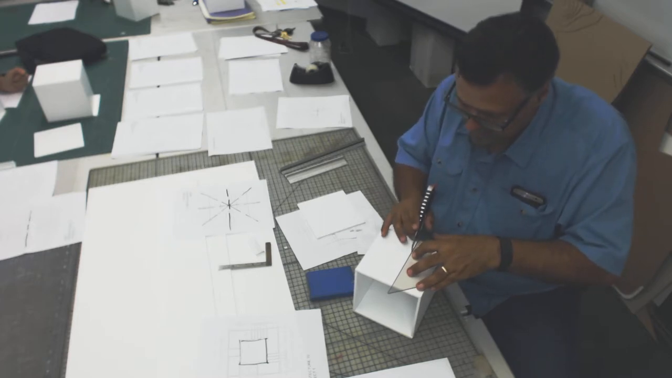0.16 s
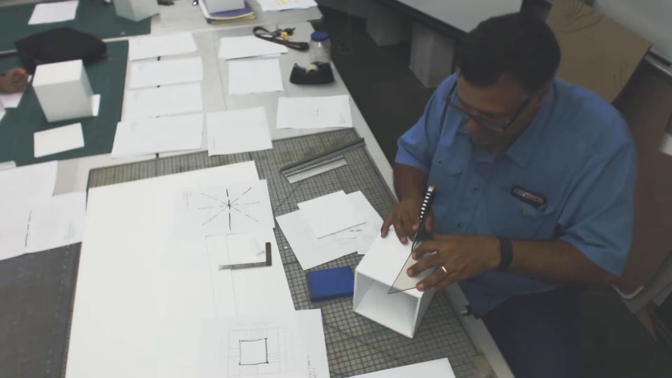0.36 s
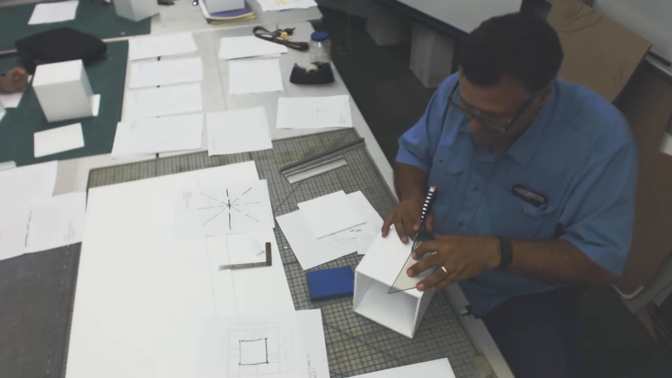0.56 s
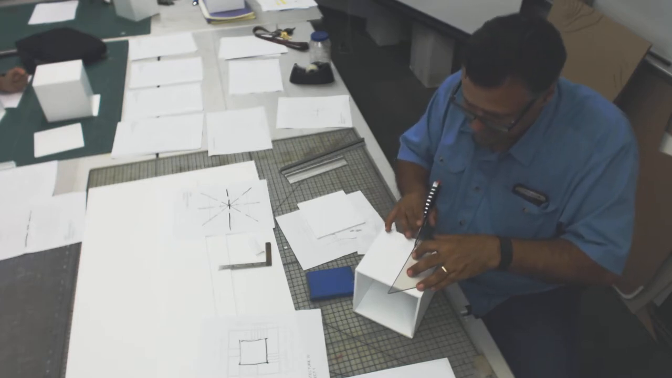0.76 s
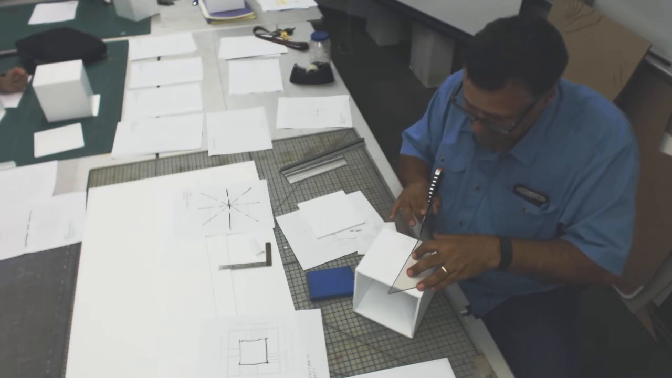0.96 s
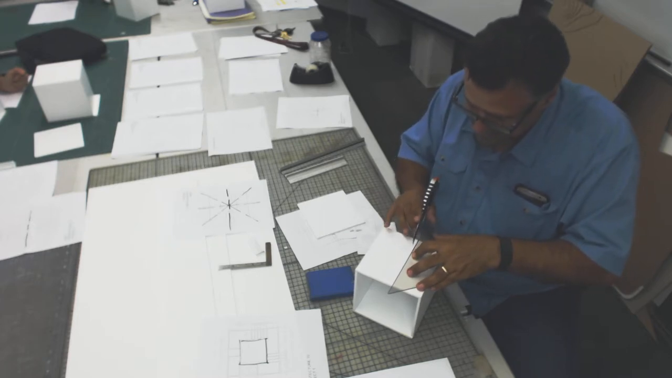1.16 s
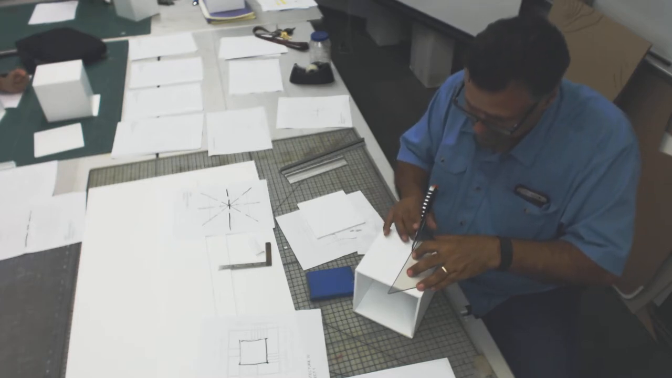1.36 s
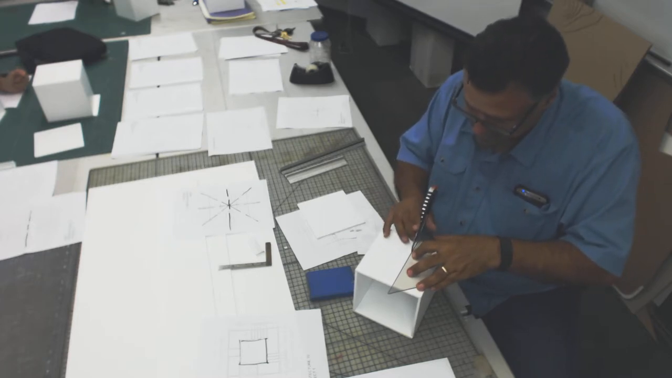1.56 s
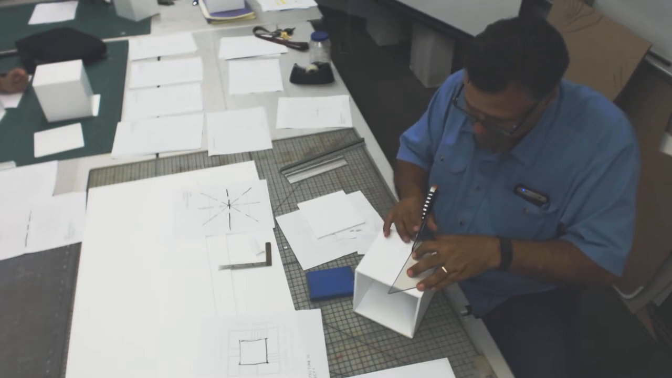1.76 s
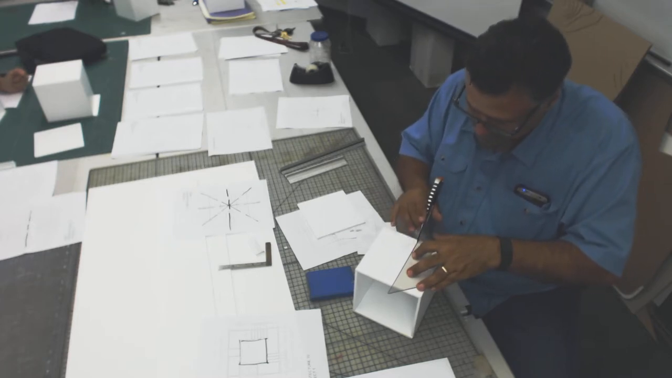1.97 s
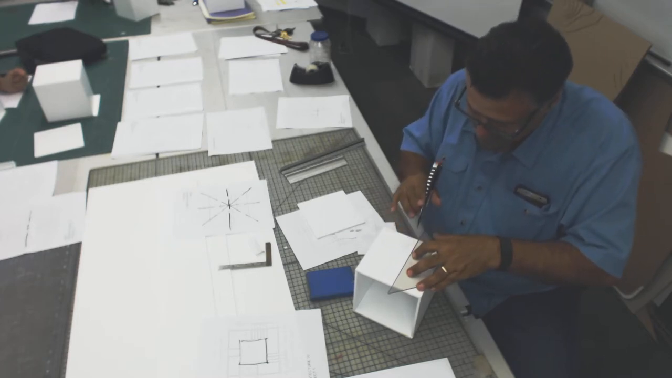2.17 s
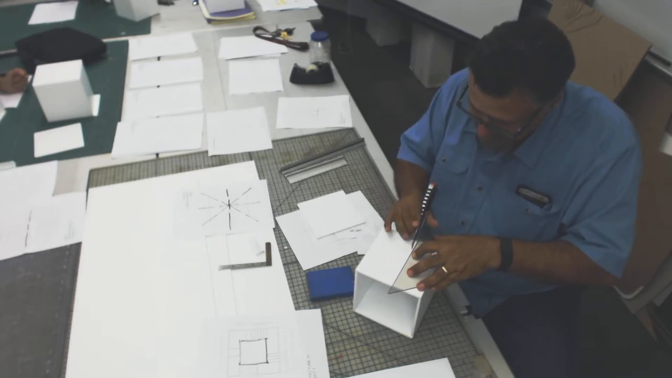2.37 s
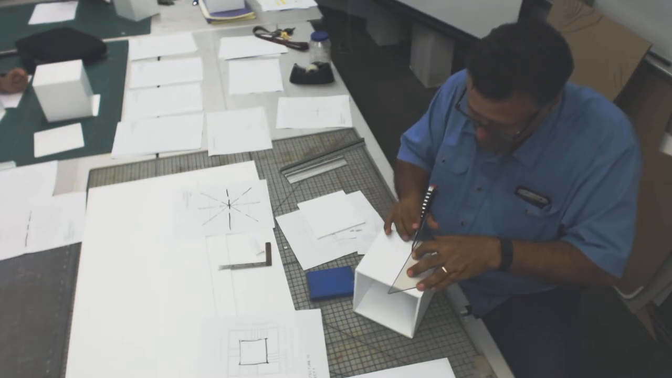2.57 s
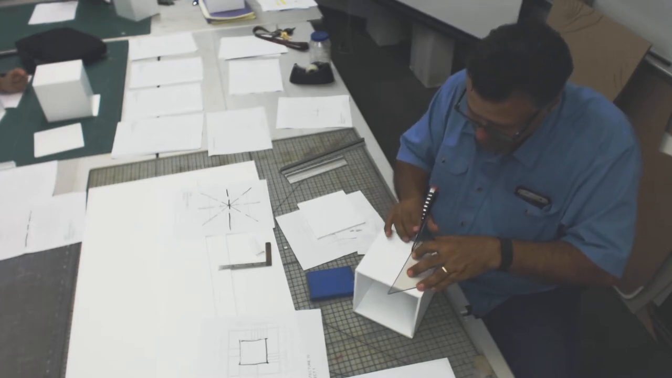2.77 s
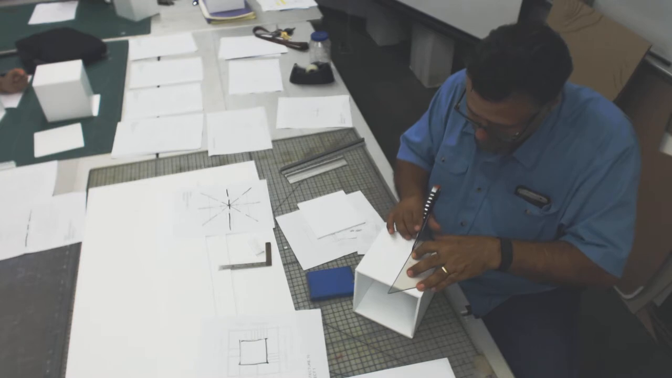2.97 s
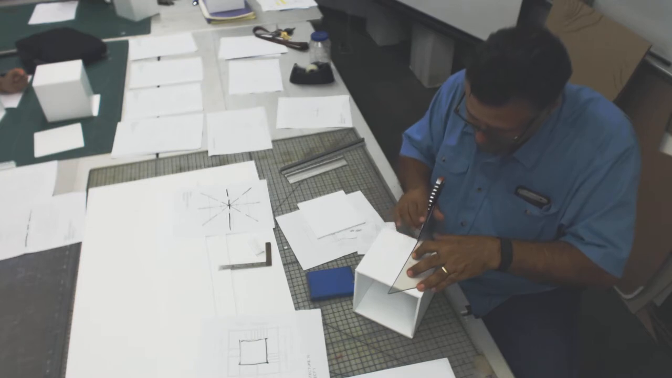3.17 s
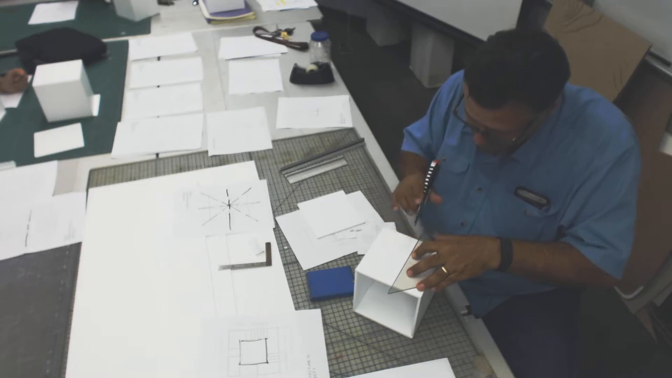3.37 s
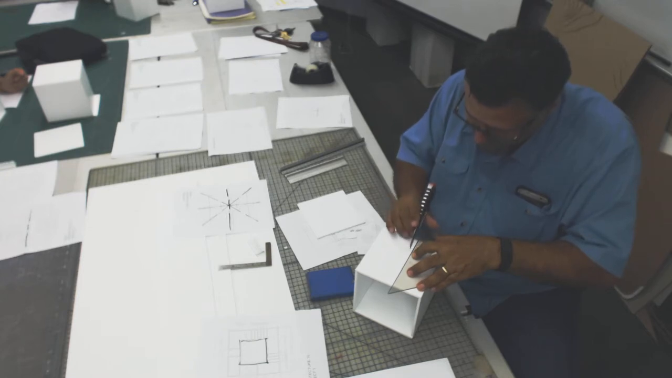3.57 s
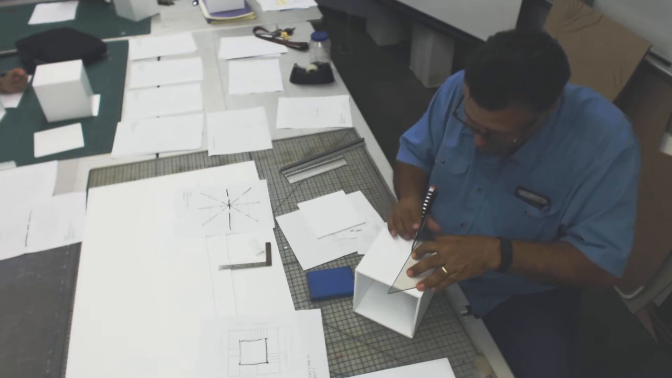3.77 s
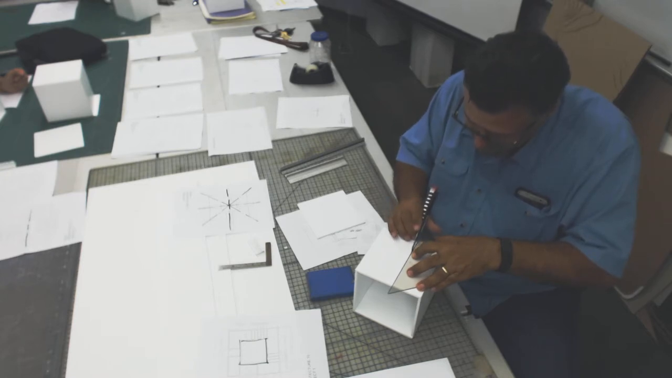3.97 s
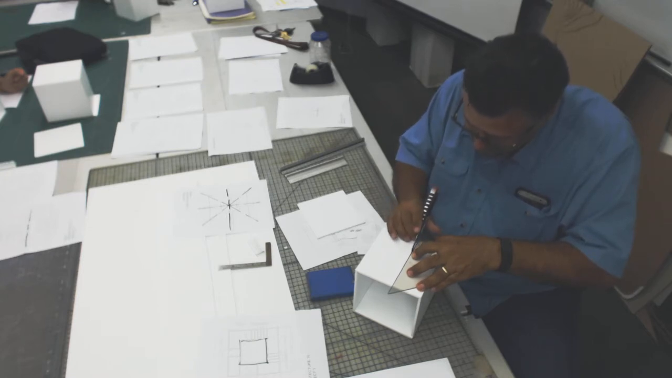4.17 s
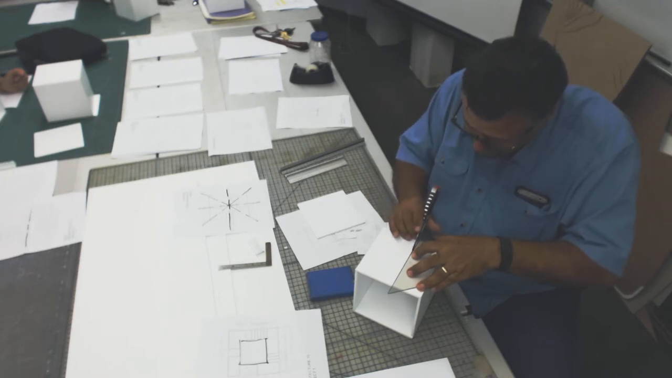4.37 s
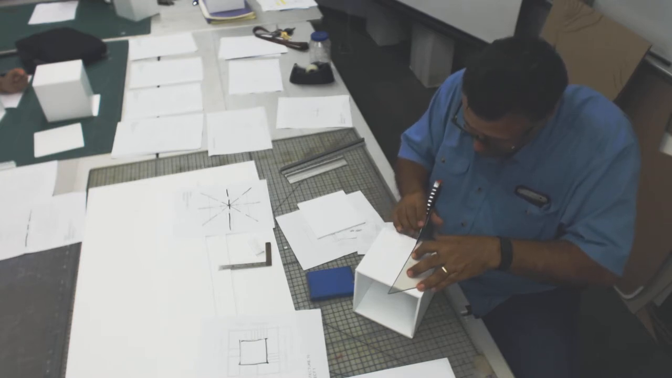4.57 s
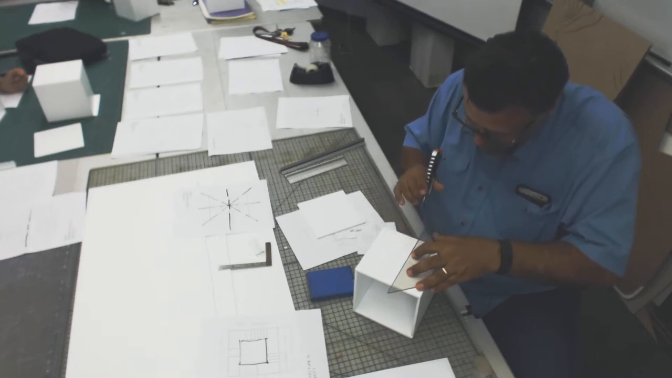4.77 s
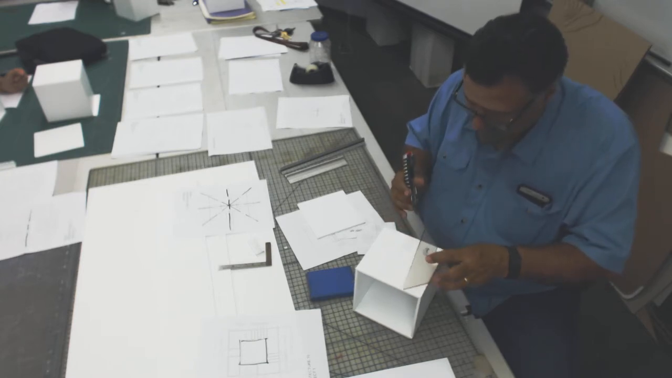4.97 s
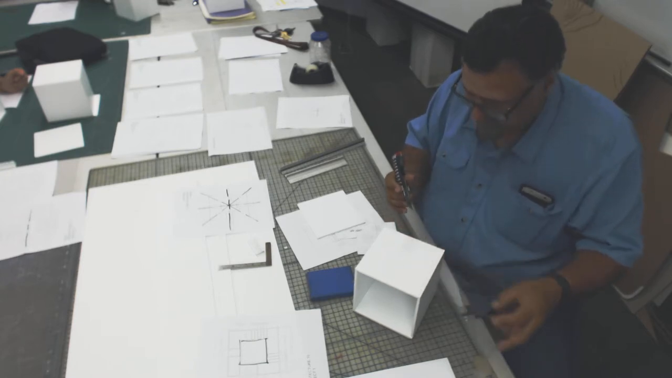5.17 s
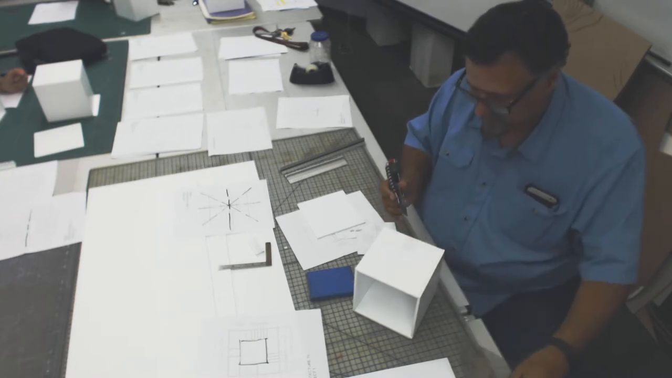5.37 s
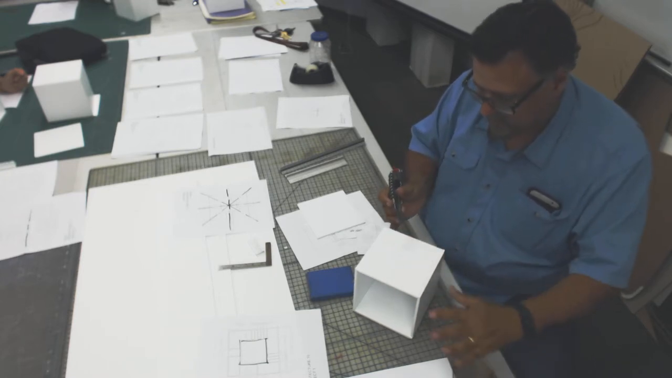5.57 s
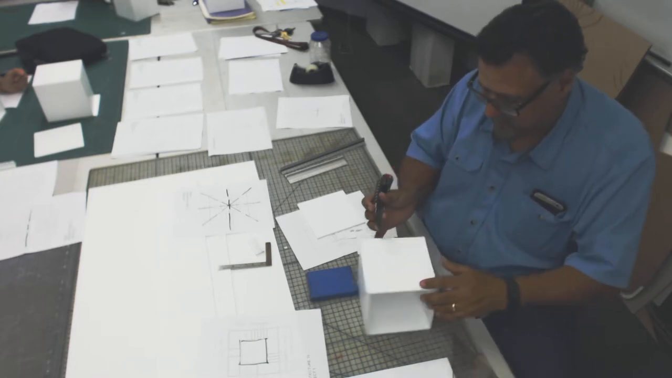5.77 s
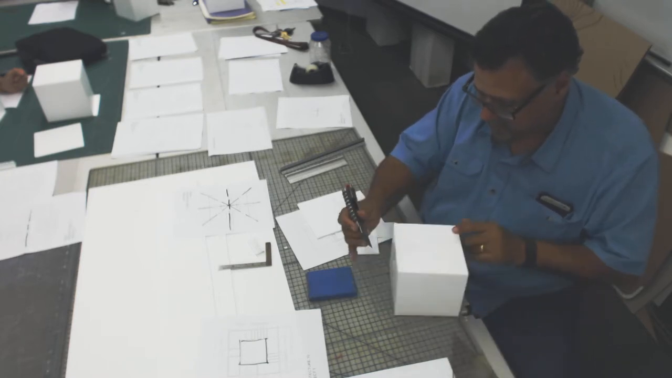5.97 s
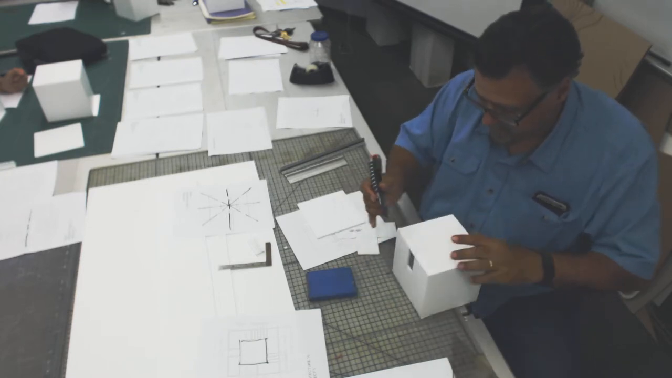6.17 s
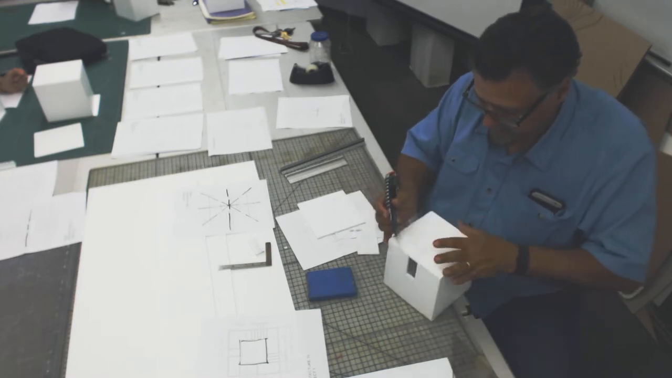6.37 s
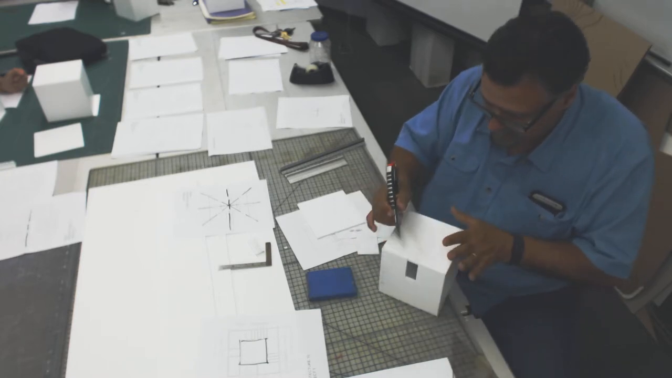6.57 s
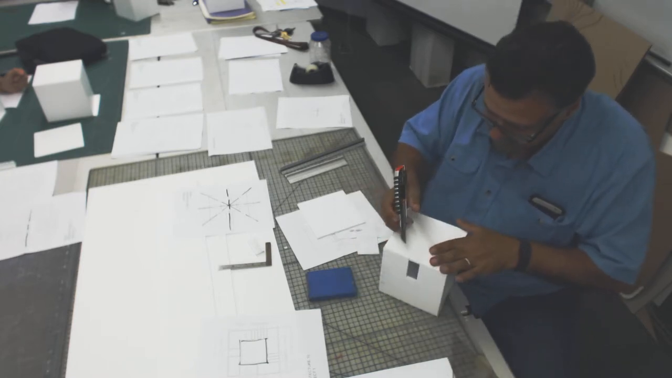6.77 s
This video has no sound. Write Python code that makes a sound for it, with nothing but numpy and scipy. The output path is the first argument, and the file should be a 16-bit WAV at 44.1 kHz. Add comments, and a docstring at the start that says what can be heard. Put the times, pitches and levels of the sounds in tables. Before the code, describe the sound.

A knife rasps through a hollow board box in short strokes, snaps free loudly, then the box thuds down and something bangs the table.

```python
"""A snap-off knife trims a hollow paper-board box on a cutting mat in a quiet classroom with faint ventilation.
Fingers push and scrape the board (swelling noise, low pulses); four strokes tear fibres (filtered clicks)
and ring the box walls, and the blade breaks out with a snap (a decaying tone, box ring and noise burst).
Then the box drops on the mat, something clatters down hard, the table rattles, and the box is shuffled round.
"""
import sys
import numpy as np
from scipy import signal
from scipy.fft import rfft, irfft
from scipy.io import wavfile

SR = 44100
rng = np.random.default_rng(int(sys.argv[2]) if len(sys.argv) > 2 else 0)


def dump(signal):
    """Clip the signal to [-1, 1] and save it as 16-bit WAV at the path in sys.argv[1]."""
    limited = np.clip(np.atleast_2d(signal).T, -1, 1)
    pcm = np.round(limited * 32767).astype(np.int16)
    wavfile.write(sys.argv[1], SR, pcm)


N = 301203
TIME = np.arange(N) / SR

# resonances of the box wall under the blade: pitch_hz [Hz], width_hz [Hz], level_db [dB]
WALL_MODES = [(200, 160, -5), (428, 110, 2), (643, 200, 2.5), (882.4, 240, 7), (1091, 100, -5.5)]


def amp(db):
    """Turn decibels into a plain multiplier."""
    return 10 ** (np.asarray(db) / 20)


def unit(x):
    """Scale to rms 1."""
    return x / np.sqrt(np.mean(x ** 2))


def add(out, start_s, x):
    """Mix x into out from time start_s."""
    i = int(start_s * SR)
    out[..., i:i + x.shape[-1]] += x[..., :N - i]


def place(x, pan_db):
    """Share a sound between left and right; pan_db is left minus right."""
    return x * amp(np.array([[pan_db], [-pan_db]]) / 2)


def low_pass(x, hz, order):
    """Take away what lies above hz."""
    return signal.sosfilt(signal.butter(order, hz, fs=SR, output="sos"), x)


def high_pass(x, hz, order):
    """Take away what lies below hz."""
    return signal.sosfilt(signal.butter(order, hz, "high", fs=SR, output="sos"), x)


def colour(x, points, focus_hz=1000, focus_db=0):
    """Causal filter through (Hz, dB) points, falling by focus_db one octave either side of focus_hz."""
    hz, db = np.transpose(points)
    size = 2048
    octave = np.log2(np.clip(np.arange(size // 2 + 1) * SR / size, hz[0], hz[-1]))
    curve_db = np.interp(octave, np.log2(hz), db)
    curve_db = curve_db - focus_db * (octave - np.log2(focus_hz)) ** 2
    # folding the cepstrum (spectrum of the log spectrum) makes the filter respond only after its input
    cepstrum = irfft(np.log(amp(curve_db)))
    cepstrum[1:size // 2] *= 2
    cepstrum[size // 2 + 1:] = 0
    response = irfft(np.exp(rfft(cepstrum)))
    return signal.fftconvolve(x, response)[:len(x)]


def band(x, hz, width):
    """One resonance, gain 1 at its centre."""
    return signal.lfilter(*signal.iirpeak(hz, hz / width, fs=SR), x)


def ring(x, modes, order=2):
    """Steep-sided resonances side by side, at rms 1."""
    total = 0
    for hz, width, db in modes:
        edges = hz * np.exp(np.array([-.5, .5]) * min(width / hz, 1))
        steep = signal.butter(order, edges, "band", fs=SR, output="sos")
        total = total + amp(db) * signal.sosfilt(steep, x)
    return unit(total)


def walk(rate):
    """Slow random wander around zero: points of spread 1, rate per second, joined by straight lines."""
    knots = np.arange(0, N / SR + 1, 1 / rate)
    return np.interp(TIME, knots, rng.standard_normal(len(knots)))


def fibres(rate, scatter_db, catch_db):
    """Fibres give way one by one as clicks, in clusters as the edge catches and slips."""
    breaks = rng.random(N) < rate / SR
    size = amp(scatter_db * rng.standard_normal(N) + catch_db * walk(220))
    return breaks * size * rng.choice([-1, 1], N)


def ventilation():
    """Coloured noise makes a soft, restless rush; wavering sines make motor hum and a thin electrical whine."""
    # spectrum of the rush: pitch_hz [Hz], level_db [dB per Hz, relative]
    air_colour = [(15, -67), (25, -22.5), (109, -7.5), (164, -6.5), (195, -6.5), (220, -3), (273, -11.5),
                  (356, -7.5), (453, -12), (537, -17), (1140, -26), (1890, -28.5), (2710, -32),
                  (7120, -43.5), (8030, -58.5), (10400, -88.5), (17700, -120)]
    # stereo balance of the rush: pitch_hz [Hz], left_minus_right_db [dB]
    balance = [(60, -5), (100, -6.5), (180, -2.5), (300, -3), (520, -2.5), (880, -6), (1510, -1.5),
               (2590, -1), (4430, 1), (7580, 1)]
    # hum and whine: pitch_hz [Hz], typical level_db [dB rms]
    hum_tones = [(119.5, -70), (162, -72), (355, -83.5), (6901, -95.5)]
    mid, side = (unit(colour(rng.standard_normal(N), air_colour)) for _ in range(2))
    ears = []
    for sign in (1, -1):
        tilt = [(hz, sign * db / 2) for hz, db in balance]
        ears.append(colour(mid + .11 * sign * side, tilt))
    hum = np.zeros(N)
    for hz, db in hum_tones:
        level = amp(db + 2 * walk(5.0)) * np.sqrt(2)  # a sine peaks above its rms
        hum += level * np.sin(2 * np.pi * hz * TIME + .7 * walk(7.4))
    rush_db = -61 + 1.0 * walk(5)
    return amp(rush_db) * np.array(ears) + hum


def bumps():
    """Soft finger pushes: a few low cycles of a flexing wall, over the faint shifting of the hands."""
    # firm changes of grip flex the box: centre_s [s], nominal level_db [dB], pitch_hz [Hz]
    grips = [(0.122, -48.5, 557), (0.305, -44, 217), (0.457, -46.5, 352), (0.52, -44, 396),
             (0.62, -47.5, 400), (0.7, -48.5, 525), (0.78, -45.5, 430), (1.021, -38.5, 454),
             (2.015, -39, 250), (2.385, -40.5, 212), (2.432, -38, 249), (2.529, -38.5, 227),
             (2.602, -35.5, 233), (2.762, -43.5, 236), (3.219, -41, 426), (3.757, -45.5, 235)]
    push_cycles = 2.7  # half length of a push, in cycles of the wall
    # light pushes in between: rate, nominal level, its largest scatter and the middle pitch
    fidgets_per_s, fidget_db, scatter_db, fidget_hz = 5, -52.5, 0.5, 324
    rub = ring(fibres(rate=900, scatter_db=3, catch_db=3), [(300, 200, 0), (480, 200, -4)])
    out = amp(-74.5 + 1.5 * walk(24)) * rub
    waver = .9 * walk(90)  # phase wander in radians
    gap, size, pitch = rng.random(size=(80, 3)).T
    fidget_s = np.cumsum(-np.log(1 - gap)) / fidgets_per_s
    fidgets = zip(fidget_s, fidget_db + scatter_db * (2 * size - 1), fidget_hz * 2 ** (pitch - .5))
    for centre_s, db, hz in [*grips, *fidgets]:
        half = push_cycles / hz
        near = np.abs(TIME - centre_s) < 4 * half
        t = TIME[near] - centre_s
        swell = np.exp(-(t / half) ** 2 / 2)
        flex = 0.79 * np.cos(2 * np.pi * hz * t + waver[near])
        out[near] += amp(db) * swell * (flex + 0.074 * rub[near])
    return place(out, -2.5)


def scrapes():
    """Brief slips of blade and board swell and die as fibre clicks filtered into a rasp and a wall drone."""
    # slips and ticks: peak_s [s], rise_s [s], rasp_db [dB], nominal rasp_hz [Hz], wall_db [dB]
    slips = [(0.031, 0.042, -66, 2580, -67.5), (0.281, 0.028, -58.5, 2380, -76),
             (0.779, 0.0075, -71, 3340, -52), (0.892, 0.017, -67, 3320, -53.5),
             (1.1, 0.0022, -45.5, 3150, -37), (1.481, 0.0064, -52, 3200, -53),
             (1.557, 0.0078, -52, 3420, -70), (1.887, 0.0039, -62, 3420, -42),
             (1.961, 0.014, -72, 2700, -52.5), (2.19, 0.0024, -39.5, 3400, -44.5),
             (2.247, 0.0025, -42.5, 3330, -75.5), (2.338, 0.006, -58.5, 1890, -40),
             (2.559, 0.01, -45.5, 2330, -78), (2.729, 0.022, -52.5, 3530, -71),
             (3.131, 0.0074, -85, 3150, -54.5), (3.256, 0.012, -63, 3120, -44.5),
             (3.384, 0.0024, -27.5, 2500, -36), (3.818, 0.0045, -46, 3270, -54.5),
             (3.956, 0.0042, -46, 3180, -76), (4.532, 0.0086, -50.5, 2980, -45.5),
             (4.815, 0.0076, -33, 2030, -45.5), (4.861, 0.026, -45.5, 2550, -61),
             (4.888, 0.0033, -44, 2900, -68), (5.01, 0.0072, -75, 2430, -47.5),
             (5.068, 0.0088, -62.5, 3320, -74), (5.538, 0.00025, -29.5, 2970, -45.5),
             (5.567, 0.011, -45, 2720, -47.5), (5.618, 0.0016, -25.5, 3230, -29),
             (6.559, 0.0086, -37, 3500, -40), (6.796, 0.005, -70.5, 2840, -69)]
    # broad colour of the rasp: pitch_hz [Hz], level_db [dB]
    rasp_colour = [(700, -24), (1300, -1), (2000, 5), (2800, 1), (4000, -2.5), (5200, 1), (7000, 3),
                   (9000, -19.5)]
    # rise and fall of a typical slip; a slower one also dies more slowly
    typical_rise_s, typical_fall_s, fall_power = 0.017, 0.016, 0.33
    tear = fibres(rate=7000, scatter_db=3, catch_db=2)
    rasp, drone = np.zeros(N), np.zeros(N)
    for peak_s, rise, rasp_db, hz, wall_db in slips:
        fall = typical_fall_s * (rise / typical_rise_s) ** fall_power
        near = (TIME > peak_s - 6 * rise) & (TIME < peak_s + 7 * fall)
        t = TIME[near] - peak_s
        swell = np.exp(-np.maximum(-t / rise, t / fall))
        strength = np.sqrt(np.mean(swell ** 2))
        focus_hz = 3100 * (hz / 3100) ** 1.13  # spreads the pitches a little further apart
        grit = colour(tear[near], rasp_colour, focus_hz=focus_hz, focus_db=13.5)
        rasp[near] += amp(rasp_db) * strength * unit(swell * grit)
        drone[near] += amp(wall_db) * strength * unit(swell * ring(tear[near], WALL_MODES))
    return place(rasp, -.5) + place(drone, -7.0)


def strokes():
    """Long pulls: the blade bites and tearing fibres drive the box wall, the cut and the thin steel edge."""
    # pulls of the blade, then the box sliding, with nominal levels for the pressure at the end:
    # start_s [s], length_s [s], wall_db [dB], rasp_db [dB], hiss_db [dB], rasp_hz [Hz], rasp_width_hz [Hz],
    # hiss_hz [Hz], pressure_growth [dB per s, negative where it eases]
    pulls = [(0.913, 0.17, -48, -50, -58, 2750, 970, 6830, 28),
             (2.031, 0.16, -40.5, -56, -55.5, 2990, 2200, 6520, 41.5),
             (3.176, 0.2, -45, -48.5, -51, 3090, 1610, 6460, 44.5),
             (4.52, 0.32, -75, -58, -57.5, 3300, 1120, 6070, 29),
             (5.929, 0.15, -45.5, -49.5, -54.5, 3105, 1380, 5800, -9.5),
             (6.109, 0.076, -65.5, -57.5, -65, 3110, 455, 5900, -0.5),
             (6.508, 0.11, -51.5, -54.5, -56, 2950, 1004, 5670, 2)]
    attack_s, release_s = 0.012, 0.018
    bite_s, bite_attack_s = 0.022, 0.024  # the wall sounds first; the edge sinks in later and more gradually
    rasp_growth = 1.9  # tearing grows faster with pressure than drone and hiss do
    wall_top_hz = 1170  # the board is too limp to drone above this
    hiss_width_hz = 1240
    out = np.zeros((2, N))
    tear = fibres(rate=4500, scatter_db=4, catch_db=2.5)
    for start, length, wall_db, rasp_db, hiss_db, rasp_hz, rasp_width, hiss_hz, growth in pulls:
        near = (TIME > start - .1) & (TIME < start + length + .1)
        t, grains = TIME[near] - start, tear[near]
        pressure_db = growth * np.minimum(t - length, 0)
        release = np.exp(-np.maximum(t - length, 0) / release_s)
        touch = release * (1 + np.tanh(t / attack_s)) / 2
        bite = release * (1 + np.tanh((t - bite_s) / bite_attack_s)) / 2
        drone = low_pass(ring(grains, WALL_MODES), wall_top_hz, order=6)
        wall = touch * amp(wall_db + pressure_db) * drone
        fibre_tone = ring(grains, [(rasp_hz, rasp_width, 0)], order=3)
        rasp = bite * amp(rasp_db + rasp_growth * pressure_db) * fibre_tone
        edge_tone = ring(grains, [(hiss_hz, hiss_width_hz, 0), (6330, 160, -2)])
        hiss = bite * amp(hiss_db + pressure_db) * edge_tone
        out[:, near] += place(wall, -7.5) + rasp + hiss
    return out


def knock(body_db, hz, decay, rattle, crack_db, pan_db):
    """The struck panel swings, its chatter rings the whole box, and the paper face cracks."""
    # ring of the box on the table: pitch_hz [Hz], width_hz [Hz], level_db [dB]
    box_modes = [(138, 92, -5), (166, 23, -5.5), (295, 11, -15), (431, 390, 4.5), (591, 81, 1.5),
                 (688, 60, 6.5), (840, 320, 0.5), (1104, 86, -7), (1440, 93, -9.5), (1883, 580, -14)]
    # colour of the paper crack: pitch_hz [Hz], level_db [dB]
    crack_colour = [(300, -6.5), (900, 7.5), (1400, 4.5), (2100, 7.5), (2800, -5.5), (3800, -12),
                    (5200, -6), (7000, -15), (9000, -37.5)]
    t = TIME[:SR // 4]
    panel = np.sin(2 * np.pi * hz * t) * np.exp(-t / decay) * (1 - np.exp(-t / 0.00062))
    contact = 0.3 * rng.standard_normal(len(t)) * np.exp(-t / 0.011)
    contact[0] += 2  # the first touch
    box = np.zeros(len(t))
    for k, (mode_hz, width, db) in enumerate(box_modes):
        box += (-1) ** k * amp(db) * band(contact, mode_hz, width)  # neighbours swing in opposite senses
    body = amp(body_db) * (1.255 * panel + 1.06 * rattle * box / np.abs(box).max())
    # a soft contact has little crack and stirs only the low modes
    top_hz = np.clip(7000 * amp(0.46 * (crack_db - body_db)), 900, 9000)
    body = low_pass(body, top_hz, order=2)
    crack = unit(colour(rng.standard_normal(len(t)), crack_colour))
    crack *= np.exp(-t / 0.0014) + 0.18 * np.exp(-t / 0.032)  # a quick burst and a fainter tail
    # a small panel cannot radiate far below its own note
    return high_pass(place(body, pan_db) + amp(crack_db) * crack, 0.43 * hz, order=3)


def classroom(x):
    """Reflections build up after a short gap and arrive in uneven clusters; each band dies at its own pace."""
    # echo bands: pitch_hz [Hz], t60_s [s to fall 60 dB], level_db [dB, relative]
    echo_bands = [(120, 0.43, -9), (272, 0.3, -4), (510, .33, 5), (780, .3, -0.5), (1400, 0.13, 2),
                  (2000, 0.4, -1.5), (2820, 0.47, -7), (4220, 0.3, 1.5), (7800, 0.15, -8)]
    t = TIME[:int(.8 * SR)]
    hz, t60, db = np.transpose(echo_bands)
    octave = np.log2(np.arange(len(t) // 2 + 1) * SR / len(t) + 1)  # +1 Hz avoids log of zero
    clusters = amp(2 * walk(140)[:len(t)])
    noise = rfft(rng.standard_normal((2, len(t))) * clusters)
    tail = np.zeros((2, len(t)))
    for k, share in enumerate(np.eye(len(hz))):
        # each band fades into its neighbours
        part = irfft(noise * np.interp(octave, np.log2(hz), share), len(t))
        tail += amp(db[k]) * part * np.exp(-np.log(1000) * t / t60[k])
    tail *= np.clip((t - .004) / 0.0047, 0, 1) / np.sqrt(0.019 * SR)
    mid, side = (signal.fftconvolve(x, h)[:N] for h in tail)
    return place(mid, -1.5) + .15 * side * np.array([[1], [-1]])


def table_top():
    """The hardest blow sets the table and loose things on it rattling; each resonance dies at its own pace."""
    # rattling resonances: pitch_hz [Hz], width_hz [Hz], level_db [dB], t60_s [s to fall 60 dB]
    table_modes = [(527, 130, -24, 0.56), (692, 52, -27, 0.77), (793, 110, -28, 0.7),
                   (1094, 119, -33, 0.57), (1350, 220, -29.5, 0.48), (1860, 200, -38.5, 0.63),
                   (4100, 900, -41.5, 0.51), (6100, 1200, -50, 0.5)]
    start_s = 5.632
    t = TIME[:SR // 2]
    out = np.zeros(N)
    chatter = fibres(rate=3000, scatter_db=3, catch_db=3)[:len(t)]  # the same random clicks serve as rattle
    rattle = np.zeros(len(t))
    for hz, width, db, t60 in table_modes:
        rattle += amp(db) * ring(chatter, [(hz, width, 0)]) * np.exp(-np.log(1000) * t / t60)
    add(out, start_s, rattle * (1 - np.exp(-t / 0.0044)))
    return place(out, -1)


def scene():
    """Cutting, handling and knocks on the table, with the classroom's echo and ventilation."""
    # snaps, knocks and their rebounds: start_s [s], nominal body_db [dB], panel_hz [Hz],
    # rattle [nominal share], crack_db [dB], left_minus_right_db [dB, body only]
    knocks = [ (1.097, -32, 790, 0.32, -44, -9), (2.19, -30.5, 910, 0.29, -40.5, -16.5),
              (3.3626, -8, 737, 0.16, -28, -6), (3.3833, -12.5, 944, 0.29, -17.5, -4),
              (3.389, -23, 466, 0.22, -34, -10), (3.555, -47.5, 655, 0.93, -55, -5),
              (4.821, -28.5, 474, 0.5, -24, -7), (5.149, -16.5, 331, 0.43, -44.5, -5),
              (5.158, -22.5, 516, 0.57, -44, -6.5), (5.176, -20, 325, 0.39, -51.5, -4),
              (5.209, -27.5, 410, 0.15, -69, -4), (5.236, -31.5, 370, 0.1, -72, -5),
              (5.274, -38.5, 390, 0.08, -75.5, -3.5), (5.631, -5, 284, 0.78, -8, -1.5),
              (5.639, -12, 192, 0.6, -13.5, -2), (5.657, -13, 355, 0.36, -24.5, 0),
              (5.7, -36, 233, 0.5, -44, -8), (5.938, -23.5, 372, 0.36, -35.5, -2.5),
              (5.945, -23.5, 332, 0.57, -37.5, -6), (5.985, -10.5, 424, 0.42, -25.5, -7.5),
              (6.011, -23, 193, 0.72, -57, -3.5), (6.058, -12.5, 306, 0.26, -51, -6.5),
              (6.083, -18, 368, 0.12, -38, -7.5), (6.117, -27, 266, 0.28, -72, -3),
              (6.157, -31.5, 285, 0.27, -53, -2.5), (6.561, -33.5, 438, 0.31, -31.5, -6.5)]
    panel_cycles = 1.7  # a struck panel dies within a few swings
    # blows through the table are central and fill the room; those on the box alone sound right and stay dry
    central_room_db, room_per_pan = -4.5, 0.95  # room level of a central blow; dB lost per dB off centre
    handling = strokes() + scrapes() + bumps()
    blows = np.zeros((2, N))
    to_room = amp(-20.0) * handling.mean(axis=0)
    for start_s, body_db, hz, rattle, crack_db, pan_db in knocks:
        blow = knock(body_db, hz, panel_cycles / hz, rattle, crack_db, pan_db)
        add(blows, start_s, blow)
        # pan_db is negative to the right, so it lowers the room level
        add(to_room, start_s, amp(central_room_db + room_per_pan * pan_db) * blow.mean(axis=0))
    return handling + blows + table_top() + classroom(to_room) + ventilation()


def record(dry):
    """A speech microphone: rounded peaks, no deep bass and nothing above the sibilants."""
    top_hz = 7700
    thin = high_pass(np.tanh(dry), 48, order=2)
    return low_pass(thin, top_hz, order=16)


dry = scene()
out = record(dry)
dump(out)
```